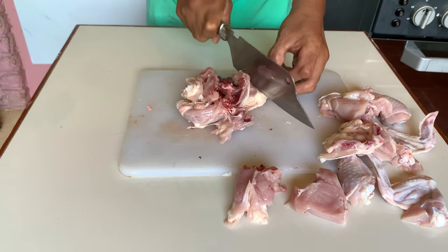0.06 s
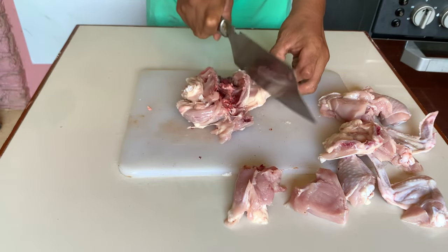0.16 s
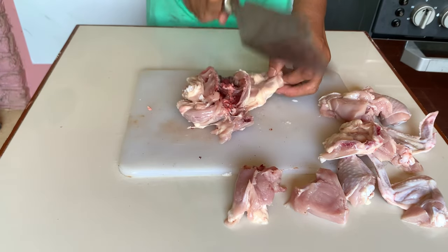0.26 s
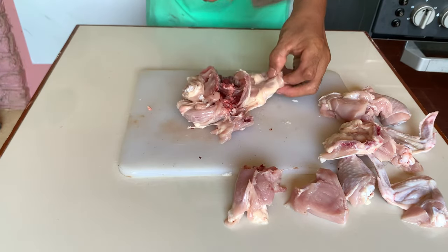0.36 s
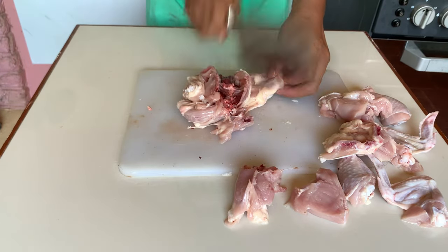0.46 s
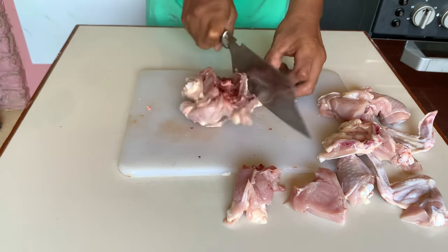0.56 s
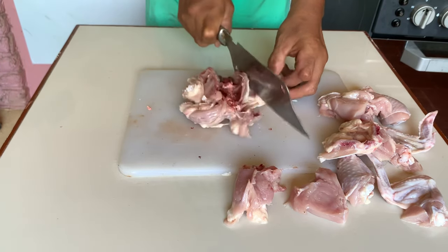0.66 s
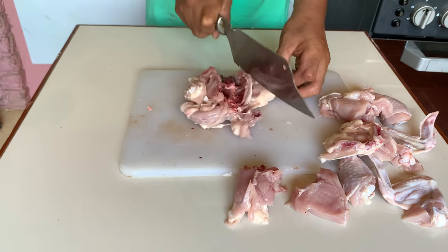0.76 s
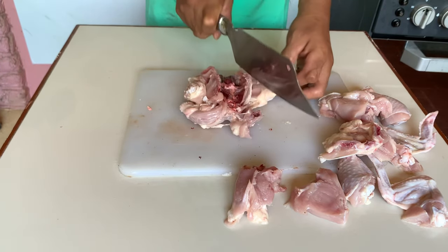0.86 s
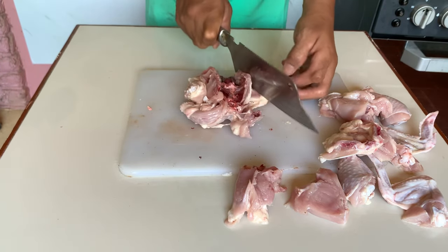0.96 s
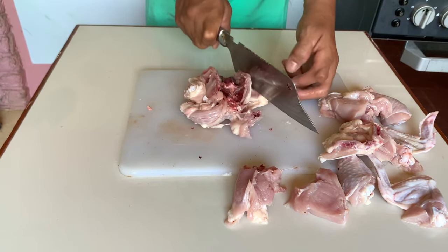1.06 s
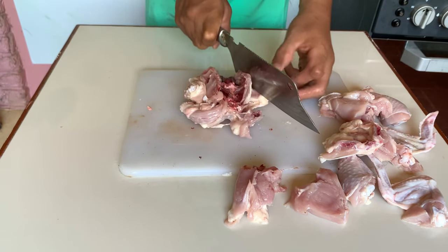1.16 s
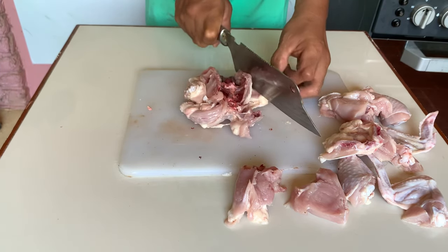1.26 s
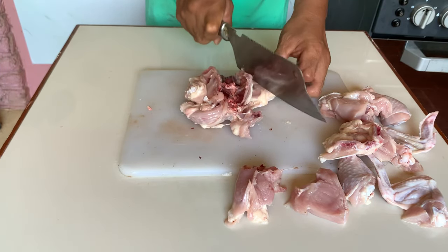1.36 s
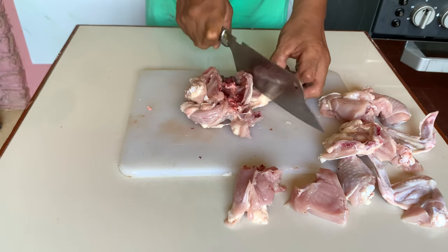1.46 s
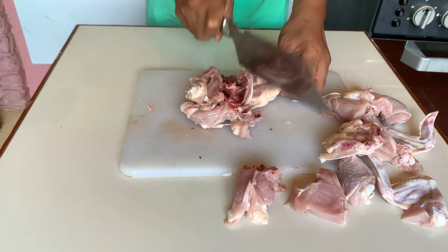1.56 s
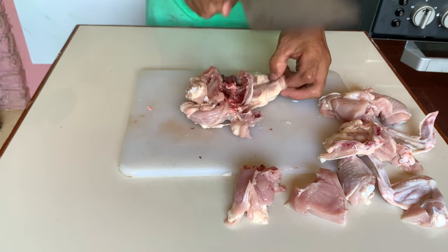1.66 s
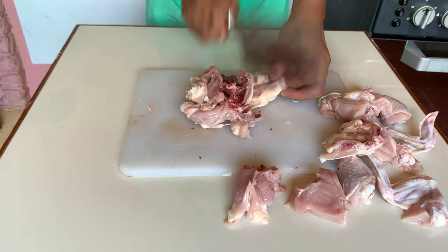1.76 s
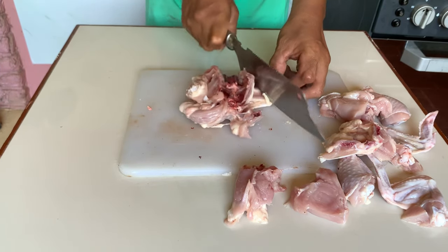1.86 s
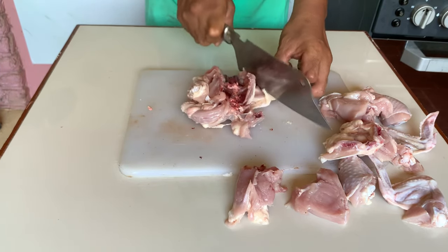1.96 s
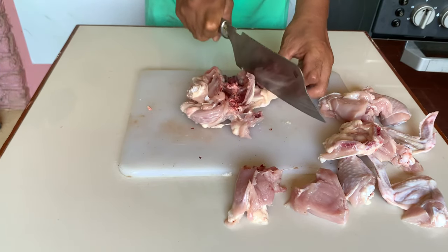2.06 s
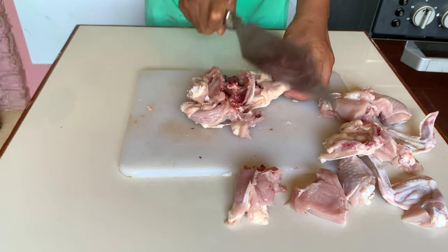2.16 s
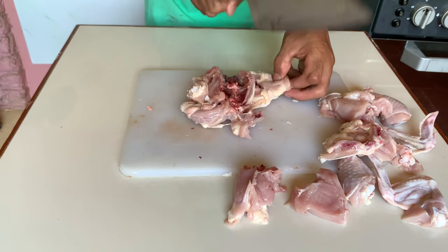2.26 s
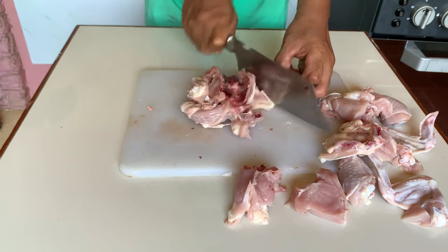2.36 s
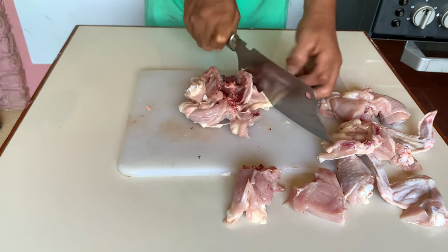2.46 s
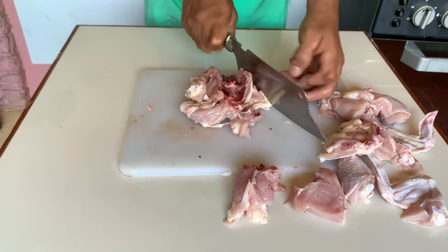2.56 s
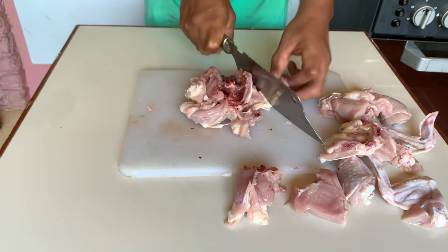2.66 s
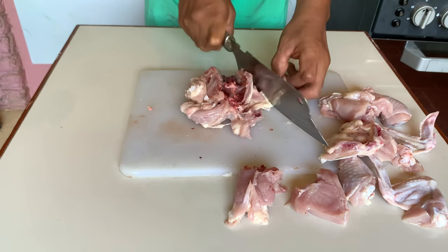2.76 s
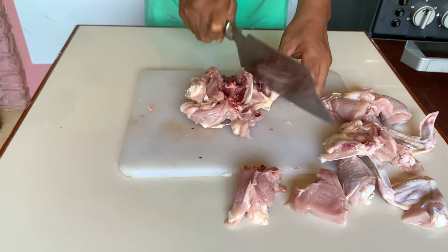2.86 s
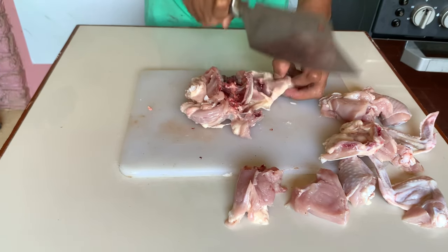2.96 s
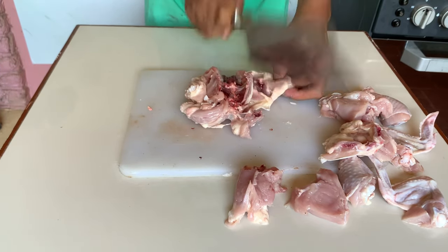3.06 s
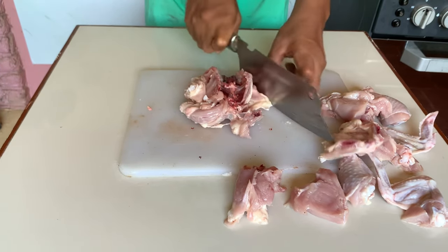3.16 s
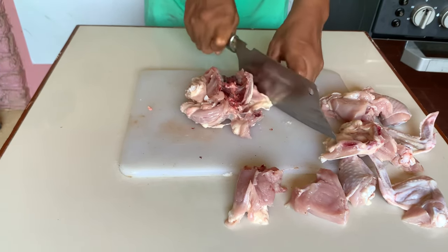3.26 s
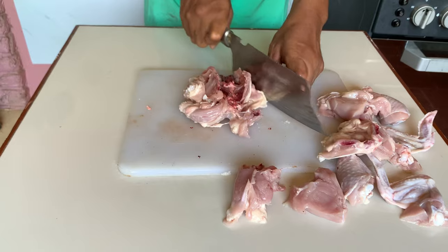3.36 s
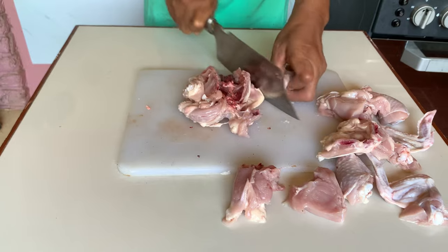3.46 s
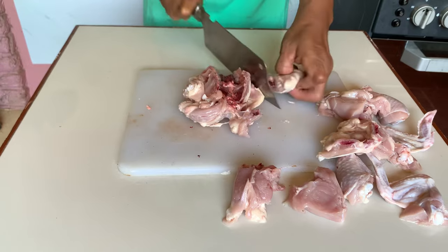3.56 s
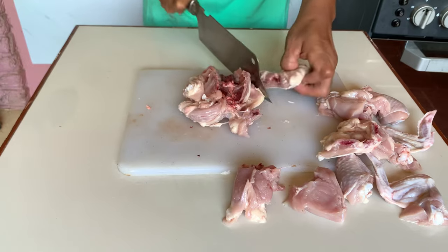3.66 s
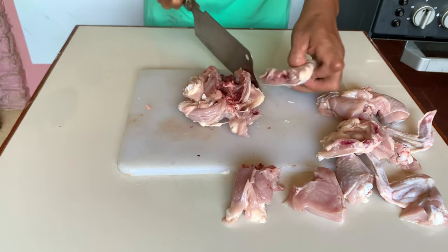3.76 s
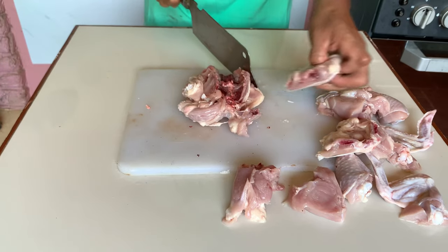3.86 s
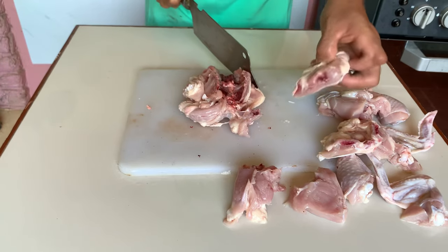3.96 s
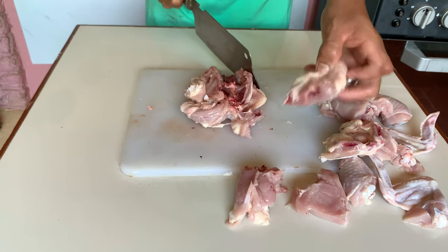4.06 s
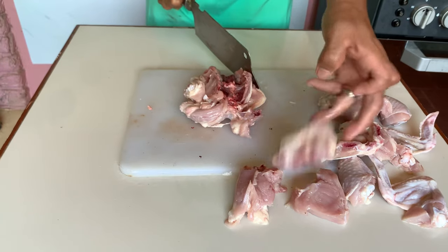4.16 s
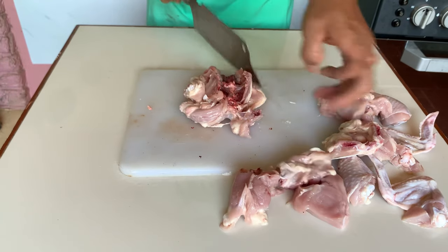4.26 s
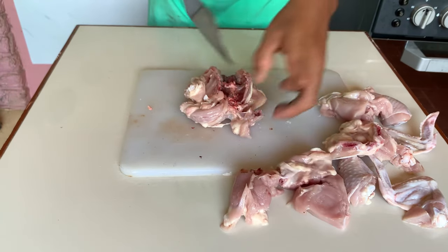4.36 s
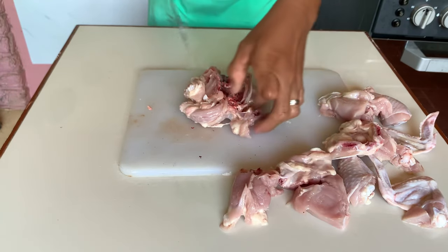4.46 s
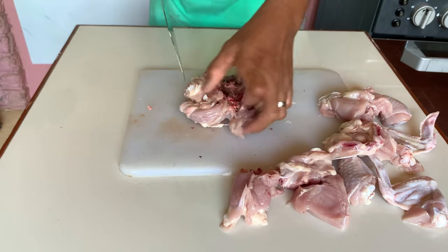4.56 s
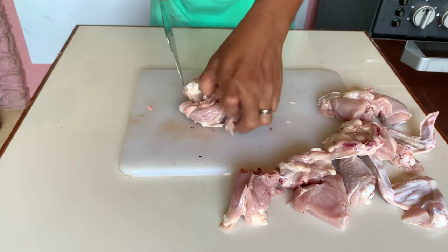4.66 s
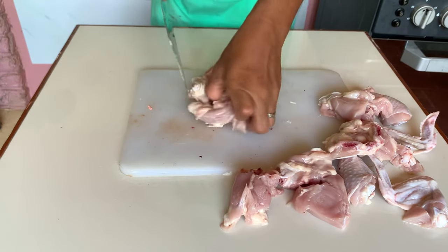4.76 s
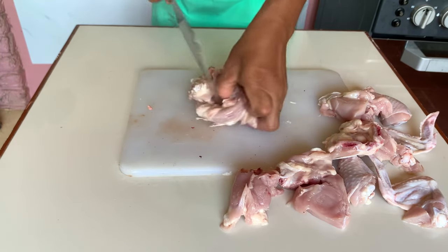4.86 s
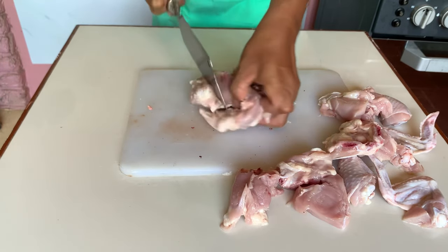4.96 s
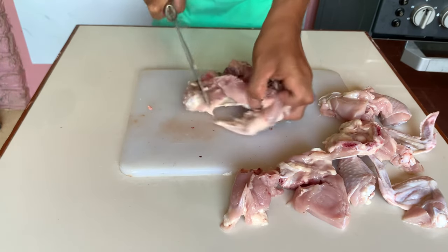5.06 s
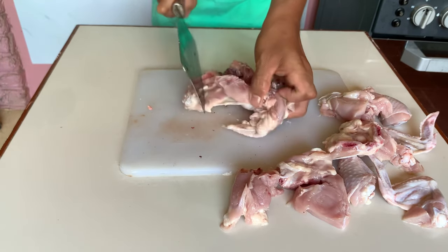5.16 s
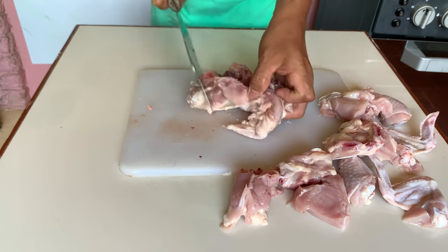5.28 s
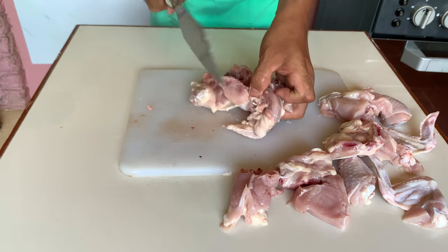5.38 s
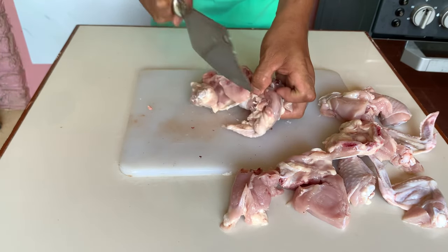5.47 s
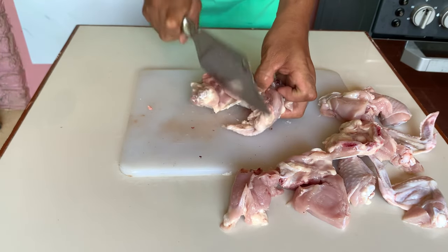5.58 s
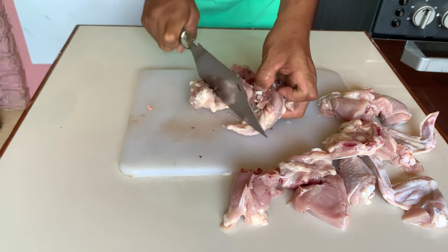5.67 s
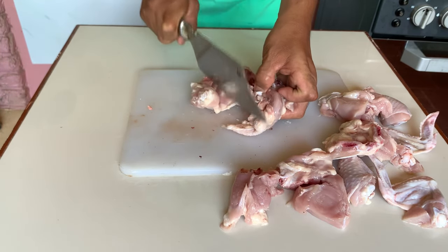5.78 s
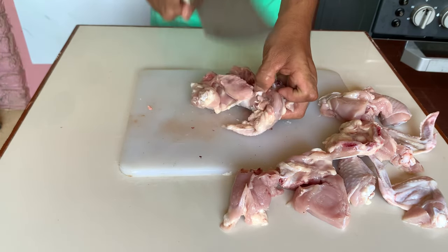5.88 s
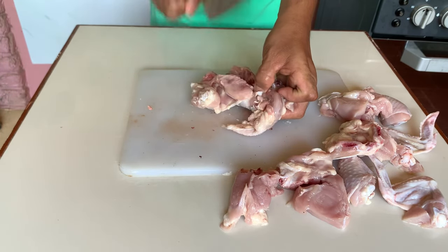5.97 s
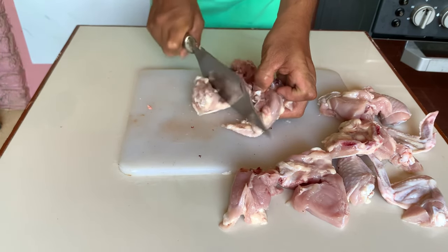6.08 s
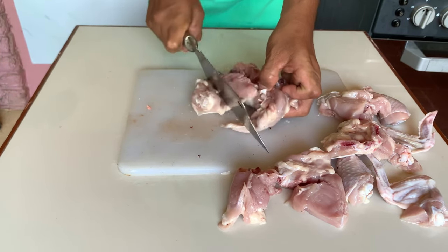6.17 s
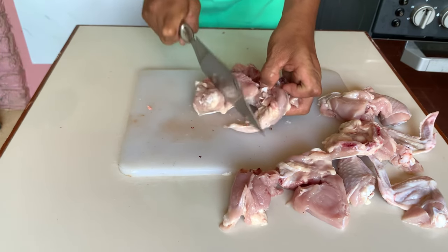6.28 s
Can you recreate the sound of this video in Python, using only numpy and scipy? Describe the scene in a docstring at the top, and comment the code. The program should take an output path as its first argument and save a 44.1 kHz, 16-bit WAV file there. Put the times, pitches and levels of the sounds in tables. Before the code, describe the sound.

Five abrupt cleaver blows split meat and bone on a board lying on a table. The first is crisp, the next two boom deeply, the fourth is drier and harder, the last dull and heavy. Between them come soft thuds, wet dragging and tiny clicks. The stereo microphone is near; the room is small and reverberant, with quiet low background noise.

```python
"""Chopping raw chicken in a small kitchen

A cleaver chops raw chicken on a plastic board that lies on a table in a small, hard-walled kitchen.
Each chop adds noise bursts for splitting bone and the biting edge to decaying modes of blade, board and table.
Between chops the blade drags through wet meat (stick-slip noise) and pieces are put down (bumps, clicks, pings).
Noise tails, wall echoes and standing waves form the room; below lie filtered air noise, a hum and a far engine.
"""
import sys
import numpy as np
from scipy import signal
from scipy.fft import rfft, irfft, next_fast_len
from scipy.io import wavfile
from scipy.ndimage import uniform_filter1d

SR = 44100
rng = np.random.default_rng(int(sys.argv[2]) if len(sys.argv) > 2 else 0)


def int16_out(signal):
    """Quantize to a 16-bit WAV file."""
    q = np.round(np.clip(np.atleast_2d(signal).T, -1, 1) * 32767)
    wavfile.write(sys.argv[1], SR, q.astype(np.int16))


N = 278712
TIME = np.arange(N) / SR
AGE = np.arange(SR) / SR  # one second in the life of a short sound [s]
LEAD_S = .2  # room before the loudest moment of a swelling noise
OPPOSITE = np.array([[1], [-1]])  # left and right in opposite phase

# Burst levels give the energy of 10 ms at that rms level. Mode pitches and levels are nominal: ring() varies them.
# Cleaver blows: (time [s], table thump [dB], push [ms], slap [dB], board knock [dB], knock tilt [dB/octave],
# board ring [Hz], board ring [dB], bone crack [dB], crack dull above [Hz], bone ring [Hz], bone ring [dB],
# edge ring [Hz], edge ring [dB], cut through the meat [ms], snap [dB], snap tilt [dB/octave])
CHOPS = [(0.4943, -19.5, 1.5, -24.5, -19, -1.5, 242, -28.5, -23.5, 8500, 760, -28.5, 10000, -25, 2.6, -18.5, -4),
         (1.7950, -7, 6.75, -20, -23, 1.5, 337.6, -28.5, -21, 7500, 2000, -26, 6320, -29, 3.1, -18.5, -7),
         (2.3728, -7, 2.2, -14, -15, 1.4, 375.7, -20.5, -22, 5500, 1820, -24, 4480, -40.5, 3.9, -23.5, 5),
         (3.1040, -18.5, 1.1, -18.5, -13, 2, 658, -28, -16.5, 2510, 1700, -25, 3210, -29, 5.5, -28, -10.5),
         (6.0486, -6.5, 3.2, -14, -16, -4, 324, -29.5, -22, 1630, 2100, -26, 5250, -38.5, 2.6, -30, 6.5)]
# Table top and the room's lowest resonances: (frequency [Hz], level [dB], t60 [s])
TABLE_MODES = [(61.7, -18, 1), (92.7, -17, 0.77), (102.8, 5.5, 0.088), (115.2, -4.5, 0.34),
               (146, -12.5, 0.41), (163.2, -11, 0.17), (172.7, -4.5, 0.32), (189.3, -24, 0.51)]
# Cutting board: (frequency [Hz], level [dB], t60 [s])
BOARD_MODES = [(211, 4, .045), (316, -1.5, 0.13), (395, -7, 0.079), (430, -1, 0.037), (515, -13, 0.047),
               (584, -1.5, 0.073), (644.4, -8.5, .07), (748.4, -14.5, 0.075), (908, -13, .06),
               (1010, -21.5, 0.11)]
# Steel blade, damped by meat and hand: (frequency [Hz], level [dB], t60 [s])
BLADE_MODES = [(1205, -3, .12), (1295, -2, .15), (1390, -2, .17), (1490, -4, .15), (1669, -2, .1),
               (1722, -1, .11), (1785, -2, .08), (1960, -2, .12), (2360, -6, .12), (6500, -9, .12),
               (8474, -6, .12)]
# Spectrum of splitting bone: (frequency [Hz], level [dB])
CRACK_SPECTRUM = [(200, -17), (600, -0.5), (1150, 1.5), (1550, -3.5), (2050, -4), (3000, -6.5), (4200, -4),
                  (5600, -9), (6800, -3), (9000, -23.5), (16000, -28)]
# Spectrum of the edge biting the board: (frequency [Hz], level [dB])
SNAP_SPECTRUM = [(2000, -22.5), (6000, -19.5), (7700, -4), (8500, 4.5), (10600, 1), (11800, -12.5),
                 (13300, 4.5), (15000, -10.5), (16500, -29)]
# Spectrum of the board slammed flat on the table: (frequency [Hz], level [dB])
SLAP_SPECTRUM = [(70, 2), (130, 5), (230, -2), (310, 3), (410, 6), (560, 0), (900, -21.5), (2000, -37.5),
                 (8000, -71)]
CRUNCH_MS = 2  # fade of the bone fractures
SNAP_SWELL_MS, SNAP_FADE_MS = 1.4, 0.93
# The board's strongest ring depends on the spot struck; bone in meat and the steel edge ring only briefly
BOARD_RING_T60_S, BONE_T60_S, EDGE_T60_S = 0.097, .014, .014
# Bending waves arrive this many cycles late; the lag levels off below the second value
BEND_LAG_CYCLES, BEND_LOWEST_HZ = 1.036, 100

# Soft bumps of meat and hands on the table: (time [s], level [dB])
BUMPS = [(0.14, -34), (0.733, -29.5), (1.606, -35), (2.699, -33.5), (3.06, -30), (3.29, -33.5),
         (3.414, -34.5), (4.052, -29), (4.437, -40.5)]
BUMP_PUSH_MS = 6.3  # soft things push the table slowly
# The blade settles and knocks the board again: (time [s], level [dB])
REKNOCKS = [(0.529, -32), (2.418, -22.5), (3.149, -23)]
REKNOCK_BLADE_DB = -16.5  # the blade's ring against the knock
# Small clicks of blade, bone and wet skin: (time [s], level [dB], centre [Hz], width [Hz], fade [ms])
CLICKS = [(1.9315, -43.5, 8900, 8000, 2.5), (2.779, -65.5, 7000, 6000, 1.5), (2.797, -54.5, 3820, 2030, 5),
          (4.207, -49.5, 3870, 2490, 1.9)]
# Swelling noise bursts: blade and hand drag over the board and through wet meat, and a short crunch leads into
# the chops at 3.10 s and 6.05 s: (time at the loudest [s], level [dB], centre [Hz], width [Hz], swell [ms],
# fade [ms], grains [1/s])
NOISE_BURSTS = [(0.677, -50.5, 7970, 6930, 22.1, 15, 1500), (2.815, -51.5, 6800, 8900, 7, 15, 3500),
                (3.094, -31.5, 1420, 1500, 3.4, 6.1, 5900), (3.218, -35.5, 850, 1340, 64, 55, 1000),
                (3.335, -32, 590, 1200, 126, 82, 820), (3.438, -47.5, 5360, 8200, 80, 90, 1100),
                (4.446, -49, 392, 410, 19, 17, 300), (4.675, -53, 700, 1380, 40, 50, 150),
                (6.04, -39, 1200, 1400, 3, 9, 3000)]
# Upper modes of the free blade as it is pulled out: (frequency [Hz], level [dB], t60 [s])
TING_MODES = [(1613, -2, 0.09), (5120, -2.5, 0.04), (6045, -6, 0.05), (7790, 0, 0.04), (8952, -3, 0.04)]
TING_S, TING_DB = 2.817, -53
# Brief ping of a light touch on the steel: (frequency [Hz], level [dB], t60 [s])
PING_MODES = [(4242, 0, .045), (8549, -8, .04), (9700, -9, .02)]
PING_S, PING_DB = 5.3, -61
# Hard little tick as a piece of meat is put down: (frequency [Hz], level [dB], t60 [s])
TICK_MODES = [(1900, -10, .008), (2600, -10, .006), (3400, -4, .006), (3850, 0, .01), (6500, -12, .005)]
TICK_S, TICK_DB = 4.2065, -46

# Two microphone ports, for sound from the board:
# (frequency [Hz], phase by which left leads [rad], left minus right [dB])
PORTS = [(100, -.3, -3), (250, -.3, -4.5), (400, -.3, -4.5), (800, 1.1, -4), (1300, .5, -1.5),
         (2000, -.7, -1.5), (3000, .6, -2.5), (5500, .2, -1.5), (7500, 1.7, 0), (11800, -2.8, 0),
         (16000, -8.8, 0)]
# Kitchen reverberation:
# (frequency [Hz], level against the sound sent in [dB], late t60 [s], likeness of left and right [-1 to 1])
ROOM = [(100, -13, 0.59, 0.78), (183, -8, 0.73, 0.3), (310, -1, 0.64, 0.42), (582, 3, 0.48, -.45),
        (944, 1.5, 0.34, -.4), (1600, -3, 0.63, -0.1), (4236, -2, 0.71, 0.47), (6760, -2, 0.58, -0.16),
        (8800, -10, 0.3, 0.3), (14680, -10.5, 0.24, -0.35)]
# Standing waves between the walls: (frequency [Hz], level at resonance against the sound sent in [dB], t60 [s])
STANDING = [(193, 6, .4), (311.7, 3, 0.42), (332, 4.5, 0.64), (408.4, 3, 0.28), (479, -4.5, 0.34),
            (533, 0.5, 0.58), (560, 2, 0.43), (625, 5.5, 0.34), (665, 2.5, 0.31), (742, 4.5, 0.24),
            (813, 0.5, 0.35), (902, 8, .3), (971.6, 6.5, 0.25)]
# Single echoes from the nearest walls: (delay at the left port [s], delay at the right port [s], level [dB])
WALLS = [(0.0109, .0107, -13), (0.0198, .019, -9.5), (.0475, .0478, -16)]

# Far engine: (full level from [s], full level until [s], mean firing rate [Hz], level before the swell [dB])
ENGINE = [(0.43, 1.4, 67, -38), (4.062, 4.35, 66.9, -49.5)]
# Its partials: (multiple of the firing rate [1], mean relative level [dB])
ENGINE_ORDERS = [(.5, -12), (1, 0), (2, -12)]
ENGINE_SWELL_S, ENGINE_FADE_S = 0.61, 0.28  # time constants
HUM_HZ, HUM_DB = 60, -50  # mains hum of a kitchen appliance, level before its waver
# Shape of the steady air noise: (frequency [Hz], relative level per Hz [dB])
AIR_SPECTRUM = [(22, -33), (36, 2.5), (60, -4), (80, 6.5), (120, -3.5), (190, -9), (330, -15.5), (650, -19),
                (1100, -21), (2100, -24), (4000, -33), (8000, -47.5), (11000, -90), (16000, -74)]
AIR_DB = -48  # before its slow swelling
# Faint resonances in the air noise: (frequency [Hz], width [Hz], level [dB])
AIR_RINGS = [(640, 50, -66), (2050, 160, -70)]
# Shape of the rush in the air noise: (frequency [Hz], relative level [dB])
RUSH_SPECTRUM = [(100, -6), (300, -7), (650, 1), (1000, 5), (1400, -1.5), (2100, -19.5), (3200, -27), (14000, -66)]
# The high hiss settles: final level, extra level at the start, time constant
HISS_DB, HISS_EXTRA_DB, HISS_SETTLE_S = -66, 7.5, 0.75
TOP_HZ = 15800  # upper band limit


def chop(s, thump_db, push_ms, slap_db, knock_db, knock_tilt_db, board_hz, board_db, crack_db, dull_hz,
         bone_hz, bone_db, edge_hz, edge_db, cut_ms, snap_db, snap_tilt_db,
         table_lag_s=0.0041, blade_db=-11, close_room_db=-7, thinned_below_hz=52):
    """Impact excitation: the edge cuts meat, splits bone and bites the board, which slaps and drives the table."""
    body, close, fractures, scattered = np.zeros((4, N))  # the close sounds reach the walls only weakly
    add(body, s, burst(ring(BLADE_MODES), crack_db + blade_db))
    add(close, s, burst(ring([(bone_hz, 0, BONE_T60_S)]), bone_db))
    add(close, s, burst(ring([(edge_hz, 0, EDGE_T60_S)]), edge_db))
    add(close, s, board_slap(slap_db, knock_tilt_db))
    knock = burst(ring(BOARD_MODES, knock_tilt_db), knock_db)
    strongest = burst(ring([(board_hz, 0, BOARD_RING_T60_S)]), board_db)
    add(body, s, bend(knock + strongest))
    add(body, s + table_lag_s, thump(thump_db, push_ms))
    # the deepest bass of board and table is thinned
    body = high_pass(body, thinned_below_hz)
    close = high_pass(close, thinned_below_hz)

    bone = [(hz, db - 10 * np.log10(1 + (hz / dull_hz) ** 4)) for hz, db in CRACK_SPECTRUM]
    lowest_hz = SNAP_SPECTRUM[0][0]
    snap = [(hz, db + snap_tilt_db * np.log2(hz / lowest_hz)) for hz, db in SNAP_SPECTRUM]
    for outline, db, swell_ms, fade_ms in [(bone, crack_db, cut_ms, CRUNCH_MS),
                                           (snap, snap_db, SNAP_SWELL_MS, SNAP_FADE_MS)]:
        add(fractures, s - LEAD_S, fracture(outline, db, swell_ms, fade_ms))
        # the walls gather the crunch from all directions, which evens out its spectrum
        add(scattered, s, burst(colour(signal.unit_impulse(SR), outline), db))
    direct = at_ports(body + close + fractures)
    return direct + kitchen(body + undb(close_room_db) * close + scattered)


def fracture(outline, db, swell_ms, fade_ms, meat_db=-6):
    """Brittle fracture: many tiny breaks share one spectrum; meat yields more quietly than bone."""
    softness = np.where(AGE < LEAD_S, undb(meat_db), 1)
    breaks = softness * crunch(swell_ms, fade_ms, spread_db=3.0)
    return burst(colour(breaks, outline), db)


def crunch(swell_ms, fade_ms, spread_db):
    """Random superposition: dense tiny fractures of uneven size swell up to LEAD_S and then fade."""
    sizes = rng.standard_normal(SR) * undb(spread_db * rng.exponential(size=SR))
    return sizes * swell_and_fade(swell_ms, fade_ms)


def board_slap(db, tilt_db):
    """Impulse response: the flat board's slap is one impulse shaped by its spectrum, spread by dispersion."""
    outline = [(hz, level + tilt_db * np.log2(hz)) for hz, level in SLAP_SPECTRUM]
    return bend(burst(colour(signal.unit_impulse(SR), outline), db))


def bend(x):
    """Dispersion: bending waves carry treble first through the board, so a knock's pitch drops in a few cycles."""
    size = 2 * len(x)
    hz = np.arange(len(x) + 1) * SR / size
    lag_s = BEND_LAG_CYCLES / np.hypot(hz, BEND_LOWEST_HZ)
    phase = -2 * np.pi * np.cumsum(lag_s) * hz[1]  # phase is the integral of group delay
    return irfft(rfft(x, size) * np.exp(1j * phase))[:len(x)]


def thump(db, push_ms, build_s=0.008):
    """Forced response: a half-sine push bends the table; a longer push is duller, and the boom builds up."""
    push = np.sin(np.pi * np.minimum(AGE * 1000 / push_ms, 1))
    boom = ring(TABLE_MODES) * (1 - np.exp(-AGE / build_s))
    return burst(signal.fftconvolve(boom, push)[:SR], db)


def ring(modes, tilt_db=0):
    """Modal superposition: free decay; spot struck and meat on it shift the modes' shares and pitch a little."""
    hz, db, t60 = np.transpose(modes)[:, :, None]
    share = undb(db + tilt_db * np.log2(hz) + 1.5 * rng.standard_normal(db.shape))
    hz = hz * (1 + .008 * rng.standard_normal(hz.shape))
    return np.sum(share * np.sin(2 * np.pi * hz * AGE) * decay(t60), axis=0)


def handling():
    """Contact excitation: bumps, knocks, clicks, blade rings, wet drags and short crunches as the meat is moved
    and cut."""
    out = np.zeros(N)
    for s, db in BUMPS:
        add(out, s, thump(db, BUMP_PUSH_MS, build_s=0.00043))
    for s, db in REKNOCKS:
        add(out, s, burst(bend(ring(BOARD_MODES, tilt_db=1.0)), db))
        add(out, s, burst(ring(BLADE_MODES), db + REKNOCK_BLADE_DB))
    for s, db, hz, width_hz, fade_ms in CLICKS:
        contact = crunch(0.32, fade_ms, spread_db=7.0)
        add(out, s - LEAD_S, burst(resonate(contact, hz, width_hz), db))
    add(out, TICK_S, burst(ring(TICK_MODES), TICK_DB))
    add(out, TING_S, burst(ring(TING_MODES), TING_DB))
    add(out, PING_S, burst(ring(PING_MODES), PING_DB))
    for s, db, hz, width_hz, swell_ms, fade_ms, per_s in NOISE_BURSTS:
        rub = grains(swell_ms, fade_ms, per_s)
        add(out, s - LEAD_S, burst(resonate(rub, hz, width_hz), db))
    return out


def grains(swell_ms, fade_ms, per_s, spread_db=6, smear=.04):
    """Random impulse noise: separate grains of uneven size over a weak, even noise."""
    caught = rng.random(SR) < per_s / SR
    sizes = np.sign(rng.standard_normal(SR)) * undb(spread_db * rng.random(SR))
    rub = smear * rng.standard_normal(SR)
    return (caught * sizes + rub) * swell_and_fade(swell_ms, fade_ms)


def at_ports(x):
    """Interaural-style difference: direct sound reaches the two ports with its own phase and level."""
    size = next_fast_len(N, real=True)
    hz, lead, pan_db = np.transpose(PORTS)
    freq = np.arange(size // 2 + 1) * SR / size
    half = OPPOSITE / 2  # each port takes half of the difference
    phase = half * np.interp(freq, hz, lead)
    gain = undb(half * np.interp(freq, hz, pan_db))
    return irfft(rfft(x, size) * np.exp(1j * phase) * gain, size)[:, :N]


def kitchen(x, early_t60=0.24, late_db=-8, gap_s=0.002):
    """Reverberation: standing waves, wall echoes, a dense early cluster and a weaker tail, new at each call."""
    hz, db, t60, likeness = np.transpose(ROOM)
    freq = np.arange(SR // 2 + 1)
    alike = np.interp(freq, hz, likeness)
    mid, side = rfft(rng.standard_normal((2, SR)))
    noise = (np.sqrt(1 + alike) * mid + np.sqrt(1 - alike) * side * OPPOSITE) / np.sqrt(2)
    arrival = np.clip(AGE / gap_s - 1, 0, 1)
    echo = standing_waves() + wall_echoes()
    for band, band_db, late_t60 in zip(np.eye(len(hz)), db, t60):
        fade = arrival * (decay(early_t60) + undb(late_db) * decay(late_t60))
        tail = irfft(noise * np.interp(freq, hz, band))  # triangular bands that overlap
        echo = echo + tail * undb(band_db) * fade / np.linalg.norm(fade)
    return signal.fftconvolve(echo, x[None], axes=1)[:, :N]


def standing_waves(spread_rad=0.88):
    """Room modes: the kitchen's own notes, each with a somewhat different phase at the two ports."""
    hz, db, t60 = np.transpose(STANDING)[:, :, None]
    phases = spread_rad * rng.standard_normal((2, len(hz), 1))
    unit_gain = 2 * np.log(1000) / t60 / SR  # makes the gain 1 at resonance
    return np.sum(undb(db) * unit_gain * decay(t60) * np.sin(2 * np.pi * hz * AGE + phases), axis=1)


def wall_echoes(low_hz=160, high_hz=2200):
    """Specular reflection: walls and cupboards return the middle; bass bends round, clutter scatters treble."""
    echo = np.zeros((2, SR))
    for left_s, right_s, db in WALLS:
        echo[0, int(left_s * SR)] += undb(db)
        echo[1, int(right_s * SR)] += undb(db)
    return signal.sosfilt(signal.butter(2, [low_hz, high_hz], "band", fs=SR, output="sos"), echo)


def engine():
    """Harmonic synthesis: only the lowest partials of a far engine pass the walls, wavering in pitch and level."""
    out = 0
    for start, end, hz, db in ENGINE:
        phase = 2 * np.pi * np.cumsum(hz * (1 + 0.0091 * walk(7))) / SR
        drone = sum(undb(part_db + 2 * walk(8.8)) * np.sin(k * phase) for k, part_db in ENGINE_ORDERS)
        before = np.minimum(TIME - start, 0)
        after = np.maximum(TIME - end, 0)
        out = out + steady(drone, db) * np.exp(before / ENGINE_SWELL_S - after / ENGINE_FADE_S)
    return out


def hum(waver_db=3):
    """Amplitude modulation: a low appliance hum, one sine, wavers slowly in level."""
    return steady(np.sin(2 * np.pi * HUM_HZ * TIME), HUM_DB) * undb(waver_db * walk(2.2))


def air(rush_db=-52.5, wide_above_hz=170, hiss_hz=4300, hiss_width_hz=5500):
    """Filtered noise: swelling air with shared bass, an opposite-phase rush, faint resonances, a settling hiss."""
    mid, side = steady(colour(rng.standard_normal((2, N)), AIR_SPECTRUM), AIR_DB) * undb(walk(2.1))
    side = high_pass(side, wide_above_hz)
    rush = steady(colour(rng.standard_normal(N), RUSH_SPECTRUM), rush_db) * undb(0.47 * walk(3.2))
    hiss = steady(resonate(rng.standard_normal((2, N)), hiss_hz, hiss_width_hz), 0)
    hiss_db = HISS_DB + HISS_EXTRA_DB * np.exp(-TIME / HISS_SETTLE_S)
    rings = 0
    for hz, width_hz, db in AIR_RINGS:
        rings = rings + steady(resonate(rng.standard_normal((2, N)), hz, width_hz), db)
    return mid + rings + (side + rush) * OPPOSITE + hiss * undb(hiss_db)


def walk(rate):
    """Slow random modulation: chance levels held 1 / rate s and slewed twice, scaled to unit deviation."""
    k = int(SR / rate)
    held = np.repeat(rng.standard_normal(N // k + 1), k)
    return steady(uniform_filter1d(uniform_filter1d(held, k), k)[:N], 0)


def colour(x, points):
    """Minimum-phase filtering: a (Hz, dB) outline made causal by folding the cepstrum of its gain."""
    size = 2 * next_fast_len(x.shape[-1])
    hz, db = np.transpose(points)
    freq = np.arange(size // 2 + 1) * SR / size
    outline = np.interp(np.log(freq + 1), np.log(hz), db)
    cepstrum = irfft(np.log(undb(outline)))
    cepstrum[1:size // 2] *= 2
    cepstrum[size // 2 + 1:] = 0
    return irfft(rfft(x, size) * np.exp(rfft(cepstrum)))[..., :x.shape[-1]]


def resonate(x, hz, width_hz):
    """Resonance: a broad second-order peak, applied twice for steep sides."""
    b, a = signal.iirpeak(hz, hz / width_hz, fs=SR)
    return signal.lfilter(b, a, signal.lfilter(b, a, x))


def high_pass(x, hz):
    """Second-order high-pass: bass below the corner falls by 12 dB per octave."""
    return signal.sosfilt(signal.butter(2, hz, "high", fs=SR, output="sos"), x)


def decay(t60):
    """Exponential decay: the amplitude falls by 60 dB in t60 seconds."""
    return np.exp(-np.log(1000) * AGE / t60)


def swell_and_fade(swell_ms, fade_ms):
    """Exponential envelope: growth up to LEAD_S, decay after it, with separate time constants."""
    ms = (AGE - LEAD_S) * 1000
    return np.exp(np.where(ms < 0, ms / swell_ms, -ms / fade_ms))


def undb(db):
    """Logarithmic level: decibels to amplitude gain."""
    return 10 ** (np.asarray(db) / 20)


def burst(x, db):
    """Energy scaling: a short sound gets the energy of 10 ms at this level."""
    return x * undb(db) / np.sqrt(np.sum(x ** 2) / (SR / 100))


def steady(x, db):
    """Power scaling: a lasting sound is set by its standard deviation, the rms level."""
    return x * undb(db) / np.std(x)


def add(track, s, x):
    """Linear superposition: mix a sound into the track from time s on."""
    start = int(round(s * SR))
    a, b = max(start, 0), min(start + len(x), N)
    track[a:b] += x[a - start:b - start]


def scene(pan_db=-1.2, handling_room_db=-3):
    """Superposition of sources: chops and handling over a background that leans a little to the right."""
    chops = sum(chop(*row) for row in CHOPS)
    small = handling()
    small_sounds = at_ports(small) + undb(handling_room_db) * kitchen(small)
    background = (engine() + hum() + air()) * undb(pan_db * OPPOSITE / 2)
    return chops + small_sounds + background


def record(dry):
    """Band limiting and saturation: thin the deepest bass, round the highest peaks and cut the top."""
    thin = high_pass(dry, 40)
    rounded = thin / (1 + thin ** 6) ** (1 / 6)
    return signal.sosfilt(signal.ellip(8, .2, 70, TOP_HZ, fs=SR, output="sos"), rounded)


dry = scene()
out = record(dry)
int16_out(out)
```